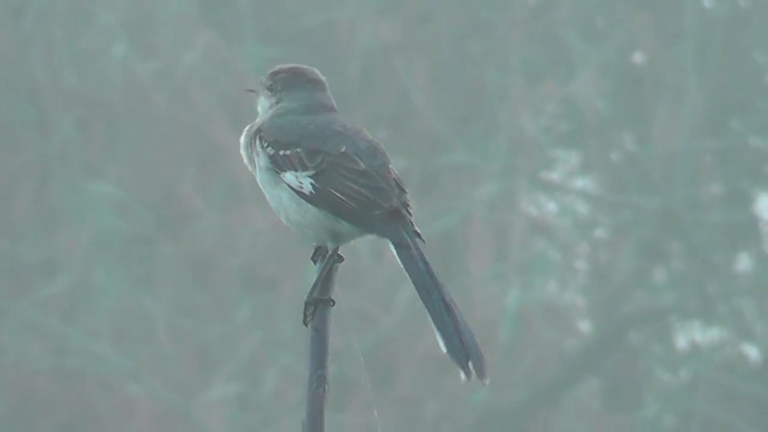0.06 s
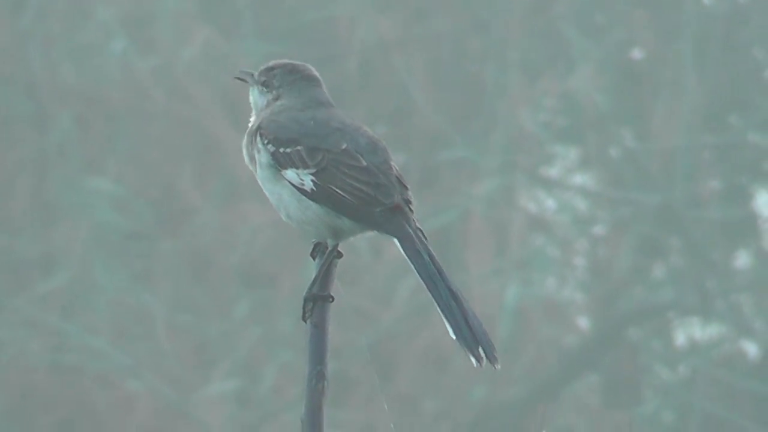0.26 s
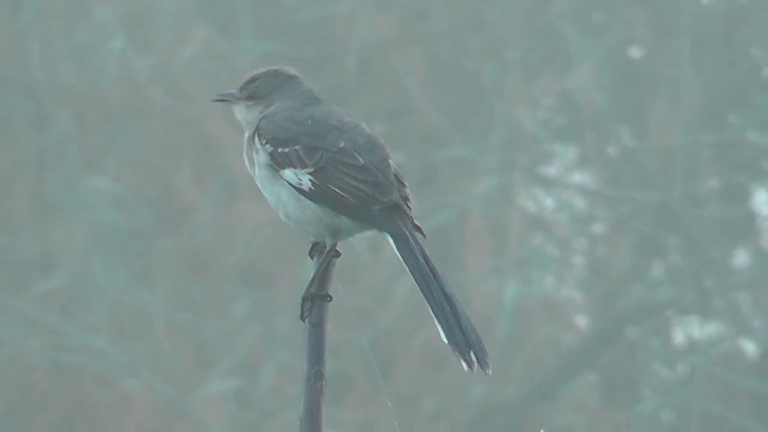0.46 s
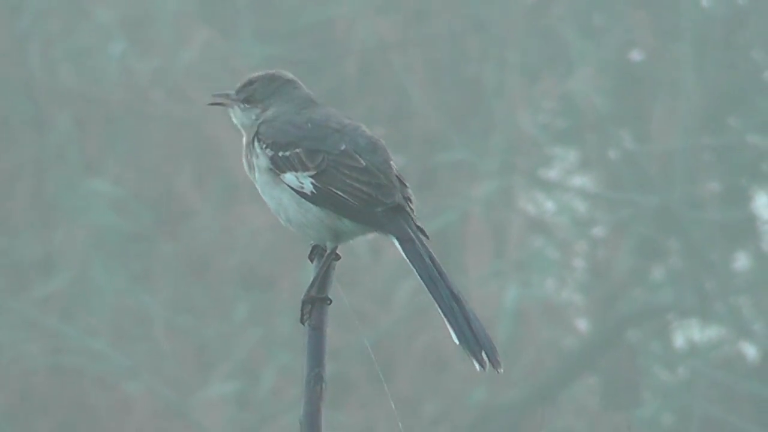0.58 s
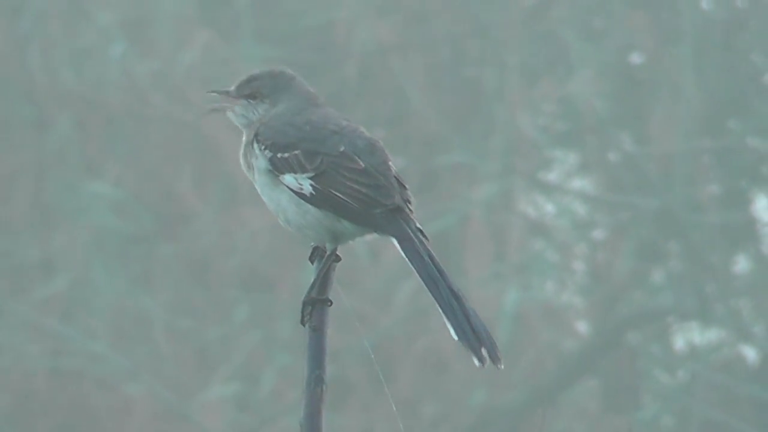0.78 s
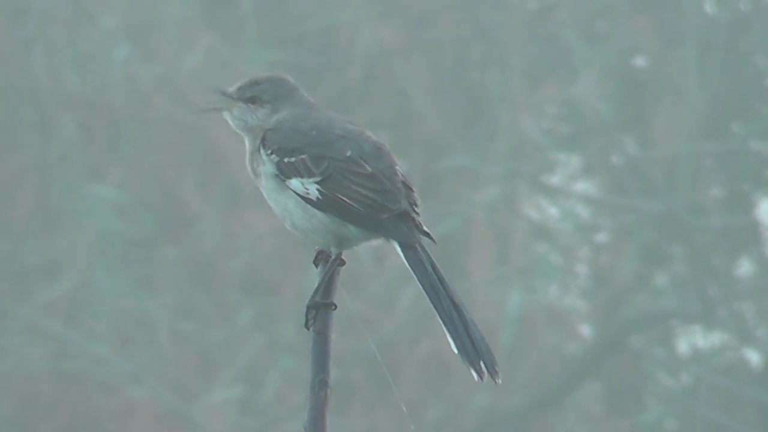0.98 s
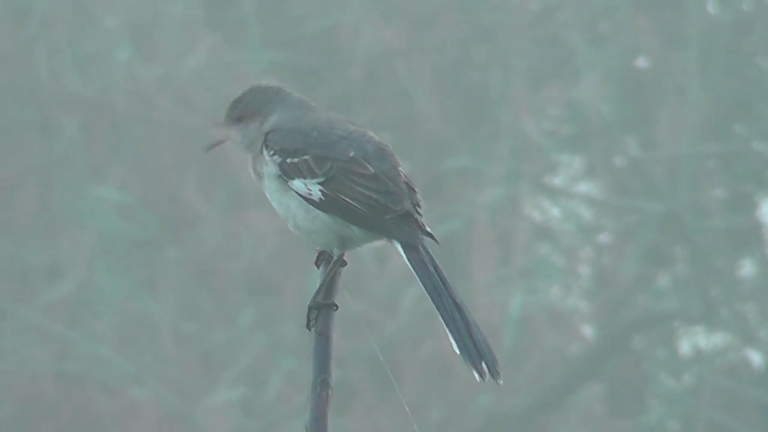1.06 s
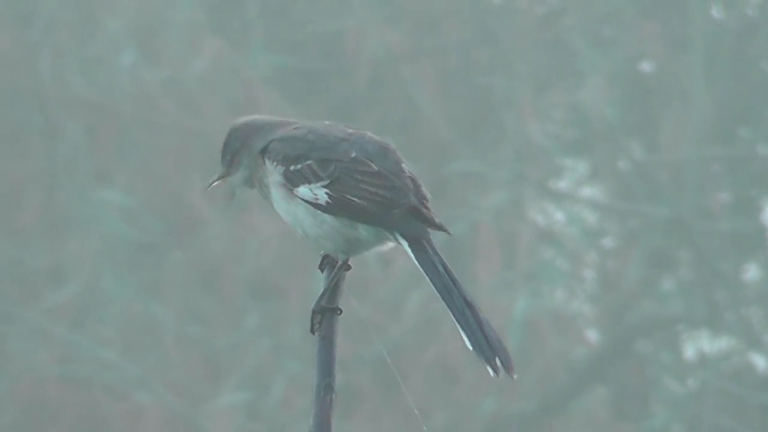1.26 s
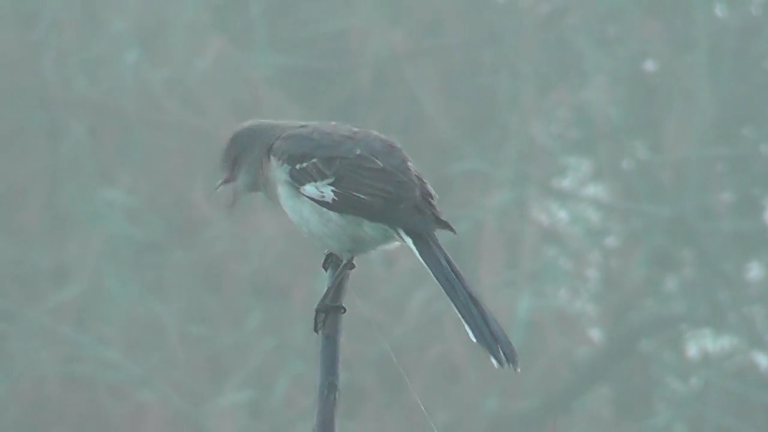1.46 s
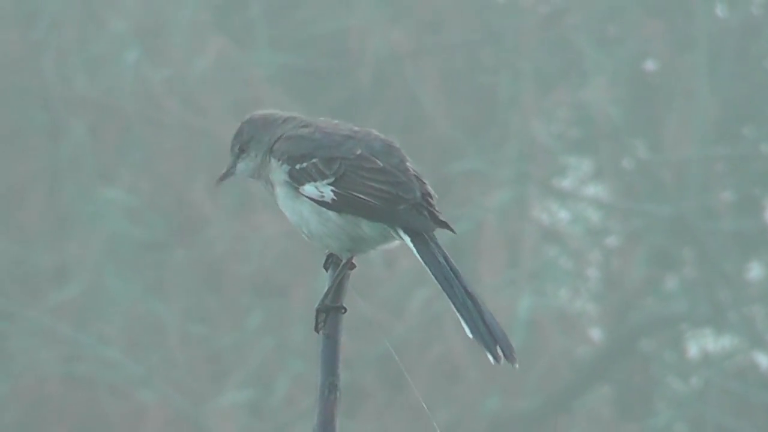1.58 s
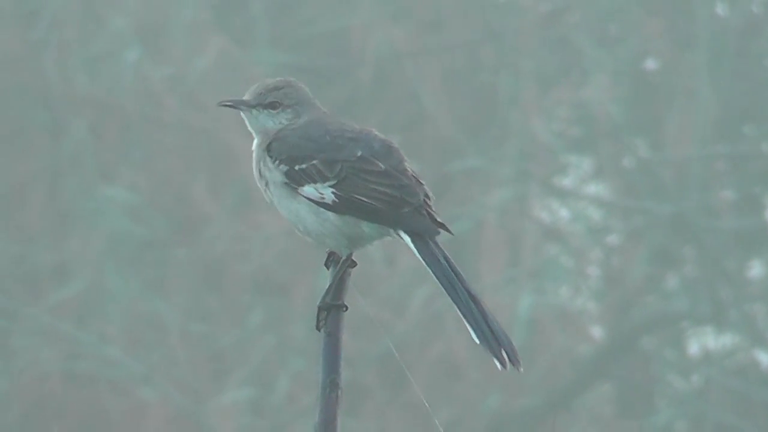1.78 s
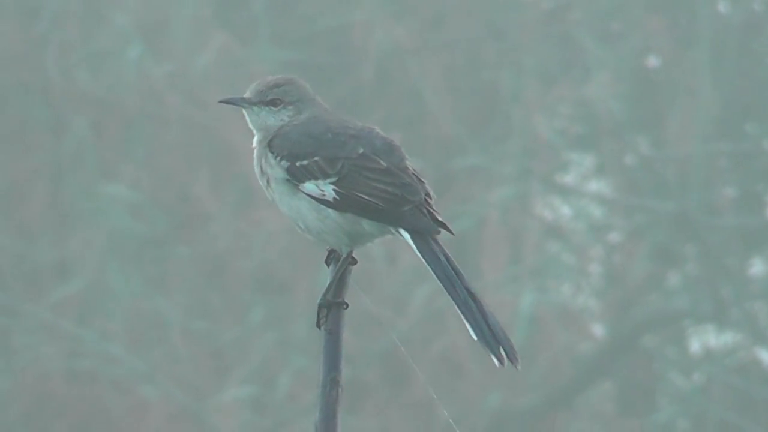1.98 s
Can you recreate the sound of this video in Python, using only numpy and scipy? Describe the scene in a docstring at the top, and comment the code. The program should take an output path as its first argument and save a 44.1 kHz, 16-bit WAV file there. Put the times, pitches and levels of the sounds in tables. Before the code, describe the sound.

A songbird gives sparse sharp whistled chirps, raspy chips and a nasal whine over steady outdoor rush

```python
"""Open brush with a bare stem, from which a mockingbird sings close to the middle of the stereo field.
The bird: gliding whistles (two falling, one low arch) with weak overtones, raspy chips, brief slurs,
a nasal whine of throat-filtered harmonics, and airy puffs of noise through a rising resonance.
The brush around it scatters a short echo of decaying noise. In the distance: a steady rush of coloured
noise with a faint hum, a fine hiss, and a thin, fast, high trill that arches in pitch and level."""
import sys
import numpy as np
from scipy import signal
from scipy.fft import rfft, irfft, next_fast_len
from scipy.io import wavfile
from scipy.ndimage import uniform_filter1d, map_coordinates

SR = 44100
rng = np.random.default_rng(int(sys.argv[2]) if len(sys.argv) > 2 else 0)


def bounce(signal):
    """Save signal as a 16-bit WAV file at the path given by the first command-line argument."""
    frames = np.transpose(np.atleast_2d(signal))
    limited = np.clip(frames, -1, 1)
    pcm = np.round(limited * 32767).astype(np.int16)
    wavfile.write(sys.argv[1], SR, pcm)


N = 90405  # samples


def amp(db):
    """Decibels to gain."""
    return 10 ** (np.asarray(db) / 20)


def unit(x):
    """Scaled to rms 1."""
    return x / np.sqrt(np.mean(x ** 2) + 1e-20)


def clock():
    """The time of every sample, in seconds."""
    return np.arange(N) / SR


def along(points, hz):
    """Interpolates (Hz, value) points on a log frequency axis."""
    f, value = np.transpose(points)
    return np.interp(np.log(hz + 1), np.log(f + 1), value)


def wobble(rate):
    """A smooth curve through normal random knots, rate knots a second."""
    knots = rng.standard_normal(int(N * rate / SR) + 4)
    return map_coordinates(knots, [clock() * rate])


def filtered(x, response):
    """x times a response of frequency."""
    m = next_fast_len(N + SR // 2)
    hz = np.fft.rfftfreq(m, 1 / SR)
    return irfft(rfft(x, m) * response(hz), m)[..., :N]


def coloured(colour):
    """Mono noise of rms 1 with a (Hz, dB) colour."""
    return unit(filtered(rng.standard_normal(N), lambda hz: amp(along(colour, hz))))


def leaning(x, lean, lead):
    """Stereo with left-right differences of level and phase by frequency."""
    side = np.array([[.5], [-.5]])  # each channel takes half the difference

    def response(hz):
        return amp(side * along(lean, hz)) * np.exp(1j * side * along(lead, hz))
    return filtered(x, response)


def noise(spectrum, alike):
    """Coloured stereo noise of rms 1; the mix of mid and side sets the left-right likeness."""
    def response(hz):
        turn = np.arccos(np.clip(along(alike, hz), -1, 1)) / 2
        return amp(along(spectrum, hz)) * np.array([np.cos(turn), np.sin(turn)])
    mid, side = filtered(rng.standard_normal((2, N)), response)
    return unit(np.array([mid + side, mid - side]))


def gesture(rows, fade_s=0.0025):
    """Smoothed pitch and gain of a note, fading to silence just beyond its ends."""
    s, hz, db = np.transpose(rows)
    t = clock()
    gate = np.clip(np.minimum(t - s[0], s[-1] - t) / fade_s + 1, 0, 1)
    pitch_hz = uniform_filter1d(np.interp(t, s, hz), size=130)
    return pitch_hz, gate * amp(np.interp(t, s, db))


# Colour of the overtones: f/Hz, level/dB
OVERTONE_COLOUR = [(4400, -9), (5500, 1), (6600, -5), (7600, 1.5), (9100, 1.5), (10500, -3), (12000, -5),
                   (13500, 2), (15800, -2)]
OVERTONE_FLUTTER_DB, OVERTONE_SMEAR_RAD = -1.5, .55


def tone(hz, overtones_db, jitter):
    """A slightly unsteady sine with overtones that flutter in level and phase."""
    phase = 2 * np.pi * np.cumsum(hz * (1 + jitter * wobble(900))) / SR
    out = np.sin(phase)
    for k, db in enumerate(overtones_db, 2):
        level = db + along(OVERTONE_COLOUR, k * hz) + OVERTONE_FLUTTER_DB * wobble(500)
        out = out + amp(level) * np.sin(k * phase + OVERTONE_SMEAR_RAD * wobble(1200))
    return np.sqrt(2) * out  # rms 1 for the fundamental


# Distant rush: f/Hz, relative level/dB (per Hz)
RUSH_SPECTRUM = [(25, -60), (60, -55), (110, -48), (190, -34.5), (260, -23.5), (340, -9), (430, -7.5),
                 (510, -3.5), (670, 2), (900, -2), (1150, -6.5), (1450, -11.5), (1680, -13.5),
                 (1790, -24.5), (1950, -15), (2200, -14.5), (2360, -25.5), (2560, -16), (2800, -18),
                 (3080, -25), (3500, -20.5), (4050, -25.5), (4500, -20), (5100, -25.5), (8000, -30),
                 (16000, -39)]
# Its likeness in the left and right microphones: f/Hz, likeness/1
RUSH_ALIKE = [(60, .6), (160, 1), (280, 0.84), (680, 0.86), (950, 0.62), (1150, 0.77), (1330, 0.15),
              (1750, 0.68), (2200, 0.47), (3100, 0.62), (4500, 0.96), (9000, 0.65)]
RUSH_DB, RUSH_SWELL_DB = -39, -0.38


def rush():
    """Steady distant rush: coloured noise whose level swells slightly."""
    return amp(RUSH_DB + RUSH_SWELL_DB * wobble(7.5)) * noise(RUSH_SPECTRUM, RUSH_ALIKE)


HUM_HZ, HUM_DB = 518, -53.5


def hum():
    """Faint tone within the rush, wavering in pitch and level."""
    gain = amp(HUM_DB + 1.8 * wobble(5.95))
    return gain * tone(HUM_HZ + 3.04 * wobble(11.93), [], jitter=0.0075)


# Fine hiss: f/Hz, relative level/dB (per Hz)
HISS_SPECTRUM = [(200, -18), (2000, -14.5), (5200, -6.5), (5700, 12.5), (6200, 18), (6700, 21), (7100, 3),
                 (8000, 1.5), (10000, 0), (13000, 3), (13550, 7), (14000, 0.5), (15800, 0.5)]
# Its likeness in the left and right microphones: f/Hz, likeness/1
HISS_ALIKE = [(2000, .5), (4500, 0.99), (6400, 0.95), (7400, 0.9), (8500, 0.57), (12000, 0.4), (15000, .5)]
HISS_DB = -49


def hiss():
    """Steady fine hiss: noise strongest between 5.7 and 6.7 kHz."""
    return amp(HISS_DB) * noise(HISS_SPECTRUM, HISS_ALIKE)


# Trill level at the top of each pulse: t/s, level/dB
TRILL_LEVEL = [(0, -45), (.25, -45), (.55, -47), (.8, -46), (1.03, -45.5), (1.35, -46.5), (1.65, -46),
               (2.05, -46)]
TRILL_RATE_HZ, TRILL_START_S = 43.72, .0115  # start: the time of one pulse top
TRILL_TOP_HZ, TRILL_DIP_HZ, TRILL_PULSE_DB = 6797, 559, 8.5
TRILL_JITTER, TRILL_OVERTONE_DB = 0.00877, -24


def trill():
    """A thin high tone that arches up and swells many times a second, like an insect."""
    dip = np.sin(np.pi * TRILL_RATE_HZ * (clock() - TRILL_START_S)) ** 2  # 0 at each pulse top
    level = np.interp(clock(), *np.transpose(TRILL_LEVEL)) - TRILL_PULSE_DB * dip + 1.7 * wobble(220)
    hz = TRILL_TOP_HZ - TRILL_DIP_HZ * dip ** 1.5
    return amp(level) * tone(hz, [TRILL_OVERTONE_DB], TRILL_JITTER)


# Background, left minus right microphone: f/Hz, level/dB
BACKGROUND_LEAN = [(60, 2), (250, -5.5), (430, -4), (780, 0), (1170, 4), (1400, -0.7), (1900, 1.3),
                   (2800, 1.5), (3500, 0.4), (9000, 0.5)]
# Background, phase by which the left leads: f/Hz, phase/rad
BACKGROUND_LEAD = [(100, .55), (430, 0.77), (650, 0.74), (950, 0.74), (1400, 1), (1700, 0.056), (2400, 0),
                   (7000, 0.0091), (10000, .18)]


def background():
    """Everything beyond the brush and the hiss, placed by level and phase between left and right."""
    return leaning(rush() + hum() + trill() + hiss(), BACKGROUND_LEAN, BACKGROUND_LEAD)


# Dying away of the echo in the brush: f/Hz, t60/s
BRUSH_DECAY = [(500, .4), (3800, 0.71), (6000, 0.26), (12000, 0.31)]
ECHO_TAIL_DB, NEAR_ECHO_DB = -19.5, -13.5
ECHO_DELAY_S, NEAR_SPREAD_S = .009, 0.012


def brush(x):
    """Scattered echoes: a near cluster and a short dying tail, as delayed decaying noise."""
    hz, t, z = signal.stft(rng.standard_normal((2, SR // 2)), SR, nperseg=256)
    decay = amp(-60 * t / along(BRUSH_DECAY, hz)[:, None])
    tail = signal.istft(z * decay, SR, nperseg=256)[1]
    t = np.arange(tail.shape[1]) / SR
    near = rng.standard_normal(len(t)) * np.exp(-t / NEAR_SPREAD_S)  # the same on both sides
    echo = amp(ECHO_TAIL_DB) * tail / np.linalg.norm(tail[0])
    echo = echo + amp(NEAR_ECHO_DB) * near / np.linalg.norm(near)
    delayed = np.pad(x, (int(ECHO_DELAY_S * SR), 0))
    return signal.fftconvolve(delayed[None], echo, axes=1)[:, :N]


# Airy puffs from the bill: t/s at the middle, half length/s (to 1/e), level/dB
PUFFS = [(0.189, .03, -42), (0.282, .02, -48), (.36, .02, -45), (0.885, 0.019, -43), (1.162, 0.021, -43),
         (1.457, 0.013, -44), (1.624, 0.015, -49.5), (1.817, 0.024, -46.5)]
PUFF_HZ, PUFF_RISE_HZ_PER_S, PUFF_WIDTH_HZ = 2954, 14200, 620


def puffs():
    """Short swells of air through a resonance that rises as the bill opens."""
    def low_pass(hz):
        return 1 / (1 + (hz / (2 * PUFF_WIDTH_HZ)) ** 4) ** 2
    air_cos, air_sin = unit(filtered(rng.standard_normal((2, N)), low_pass))
    out = np.zeros(N)
    for s, half, db in PUFFS:
        t = clock() - s
        phase = 2 * np.pi * (PUFF_HZ * t + PUFF_RISE_HZ_PER_S * t ** 2 / 2)
        air = air_cos * np.cos(phase) + air_sin * np.sin(phase)  # slow noise moved up to the resonance
        out += amp(db) * np.exp(-(t / half) ** 2) * air
    return out


# Nasal whine: t/s, f/Hz (pitch), level/dB, f/Hz (upper resonance)
WHINE = [(1.282, 487.7, -53, 5600), (1.293, 507, -41, 5600), (1.318, 505, -44, 5600),
         (1.33, 531, -40.5, 5800), (1.36, 526.5, -41, 5750), (1.405, 533, -42, 5500),
         (1.45, 532.6, -41.5, 5340), (1.49, 528.4, -46.5, 5560), (1.525, 510, -47.5, 5300),
         (1.55, 444, -51, 4800)]
# The throat that shapes it: f/Hz, level/dB
THROAT = [(200, -100), (1500, -45), (2150, -31), (2560, -5), (2720, -3), (3180, -16.5), (3720, -15),
          (4250, -6), (4770, -17), (5300, -7.5), (5830, -10), (6400, -12), (7500, -23.5), (8400, -24.5),
          (12000, -47)]
WHINE_JITTER, WHINE_RASP_DB, WHINE_FLUTTER_DB = .007, -6, 2
WHINE_PEAK_DB, WHINE_PEAK_WIDTH_HZ = 8.5, 600


def whine():
    """A low buzz of which the throat passes only some high harmonics; its upper resonance sinks."""
    hz, gain = gesture([row[:3] for row in WHINE])
    s, _, _, peak_hz = np.transpose(WHINE)
    peak_hz = np.interp(clock(), s, peak_hz)
    phase = 2 * np.pi * np.cumsum(hz * (1 + WHINE_JITTER * wobble(500))) / SR
    buzz = np.zeros(N)
    for k in range(3, 21):
        lift = WHINE_PEAK_DB * np.exp(-((k * hz - peak_hz) / WHINE_PEAK_WIDTH_HZ) ** 2)
        level = along(THROAT, k * hz) + lift + WHINE_FLUTTER_DB * wobble(90)
        buzz += amp(level) * np.sin(k * phase + rng.uniform(0, 2 * np.pi))
    return gain * (buzz + amp(WHINE_RASP_DB) * coloured(THROAT))


CHIP_EDGE_DB = 12  # fall in level from the middle of a chip or slur to half a length away

# Brief slurs, some from the second side of the syrinx:
# t/s at the middle, f/Hz, slope/(Hz per s), half length/s, level/dB
SLURS = [(.9305, 6200, -60000, .006, -30.5), (1.7475, 4250, -60000, 0.0096, -46),
         (1.6, 6000, 60007, .006, -50), (1.5, 2780, -3000, .005, -43.5), (1.674, 2720, -3000, 0.0047, -42)]


def slurs():
    """Brief straight glides in pitch, some sounding along with a chip."""
    out = np.zeros(N)
    for s, hz, slope, half, db in SLURS:
        t = np.clip(clock() - s, -4 * half, 4 * half)  # the pitch stops gliding once inaudible
        gain = amp(db - CHIP_EDGE_DB * (t / half) ** 2)
        out += gain * tone(hz + slope * t, [], jitter=0.021)
    return out


# Arched chips: t/s at the top, f/Hz at the top, fall/Hz at the ends, half length/s, level/dB
CHIPS = [(0.325, 5550, 800, 0.0069, -36.5), (.676, 5560, 1600, .01, -40.5),
         (0.9333, 5430, 2000, .0075, -32), (1.773, 5530, 1900, 0.0083, -34)]
# Rasp in the chips: f/Hz, level/dB
CHIP_RASP = [(300, -100), (2000, -28), (3500, -3), (5500, 6.5), (8000, -5), (9500, -21), (15000, -30)]
CHIP_OVERTONE_DB, CHIP_FLUTTER_DB = -28, 0.5
CHIP_RASP_DB, CHIP_RASP_WIDTH = -7.5, 1.75  # width: length of the rasp over that of the chip


def chips():
    """Pitch and loudness rise and fall together in one quick, raspy arch."""
    out = np.zeros(N)
    rasp = amp(CHIP_RASP_DB) * coloured(CHIP_RASP)
    for s, top, fall, half, db in CHIPS:
        u2 = ((clock() - s) / half) ** 2
        hz = top - fall * 2 * u2 / (1 + u2)
        gain = amp(db - CHIP_EDGE_DB * u2 + CHIP_FLUTTER_DB * wobble(1100))
        out += gain * tone(hz, [CHIP_OVERTONE_DB], jitter=.035)
        out += amp(db - CHIP_EDGE_DB * u2 / CHIP_RASP_WIDTH ** 2) * rasp
    return out


# Whistled notes, one curve each: t/s, f/Hz, level/dB
WHISTLES = [
    [(.202, 4810, -38.5), (.21, 4680, -30), (.215, 4456, -21.5), (.222, 4365, -20.5), (.2265, 3995, -19),
     (.24, 3327, -19.5), (.247, 3170, -31.5), (.255, 2860, -25.5), (.261, 2790, -39)],
    [(.304, 2035, -45), (.309, 2220, -31), (.315, 2597, -29), (.324, 2550, -26), (.332, 2380, -34.5),
     (.339, 2364, -37.5), (.349, 2255, -34.5), (.352, 1950, -46)],
    [(.801, 5080, -41), (.804, 4960, -43), (.81, 4560, -44), (.823, 4410, -28), (.828, 4310, -33),
     (.833, 4076, -24.5), (.845, 3630, -28.5), (.856, 3335, -33.5), (.864, 3200, -51)],
]
# Overtones of each whistle: 2nd level/dB, 3rd level/dB, 4th level/dB
WHISTLE_OVERTONES = [(-21, -46, -55), (-30, -29, -46), (-13, -23, -29)]
# Breathy noise under the whistles: f/Hz, level/dB
WHISTLE_AIR = [(300, -100), (2500, -10), (5000, -6), (8000, 4), (9300, -1), (10500, -9), (15000, -12)]
WHISTLE_JITTER, WHISTLE_SHIMMER_DB, WHISTLE_AIR_DB = 0.0066, 1.5, -28.5


def whistles():
    """The loud, clear gliding notes, with a trace of air."""
    out = np.zeros(N)
    air = amp(WHISTLE_AIR_DB) * coloured(WHISTLE_AIR)
    for rows, overtones_db in zip(WHISTLES, WHISTLE_OVERTONES):
        hz, gain = gesture(rows)
        shimmer = amp(WHISTLE_SHIMMER_DB * wobble(400))
        out += gain * shimmer * (tone(hz, overtones_db, WHISTLE_JITTER) + air)
    return out


# Bird, left minus right microphone: f/Hz, level/dB
BIRD_LEAN = [(2000, 2), (2500, 2), (3100, -3.5), (4400, 1), (6000, 1), (9000, 2.5)]
# Bird, phase by which the left leads: f/Hz, phase/rad
BIRD_LEAD = [(2000, -0.23), (2450, -0.55), (3000, 0.096), (3900, 0.48), (5600, -0.085), (9000, 0.25)]
# Colour of the song sent into the brush: f/Hz, level/dB
ECHO_COLOUR = [(2000, -4), (3600, 2), (4500, -2), (5500, 3.5), (7500, 6), (9500, 8), (13000, 5)]


def scene():
    """The bird near the middle, its echo (rich in the overtones it beams at the brush), the background."""
    bird = puffs() + whine() + slurs() + chips() + whistles()
    echo = brush(filtered(bird, lambda hz: amp(along(ECHO_COLOUR, hz))))
    return background() + echo + leaning(bird, BIRD_LEAN, BIRD_LEAD)


TOP_HZ = 15820


def record(dry):
    """Nothing is kept above the band limit."""
    return filtered(dry, lambda hz: hz < TOP_HZ)


dry = scene()
out = record(dry)
bounce(out)
```